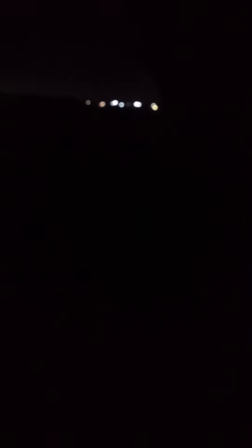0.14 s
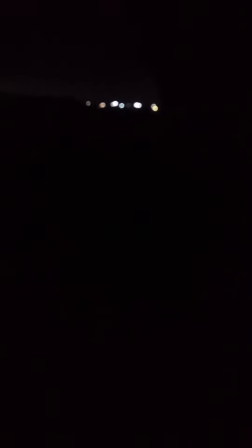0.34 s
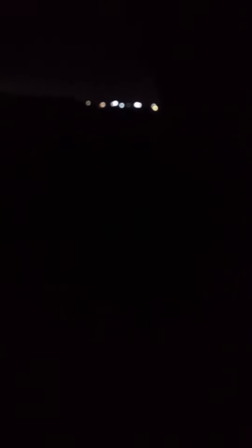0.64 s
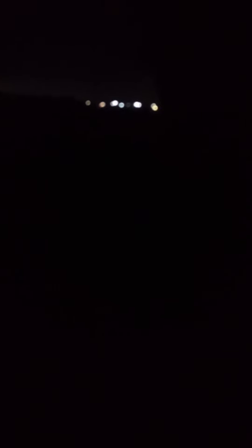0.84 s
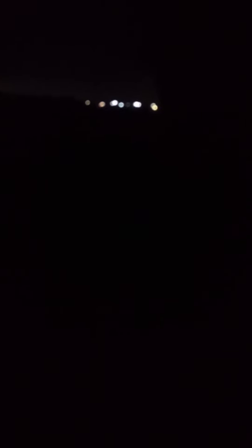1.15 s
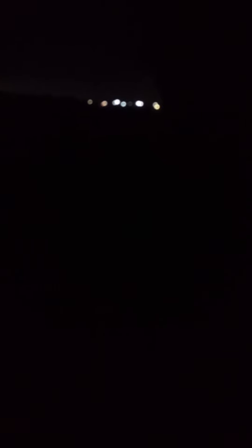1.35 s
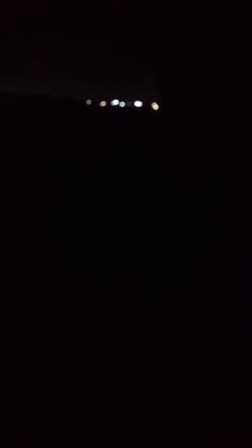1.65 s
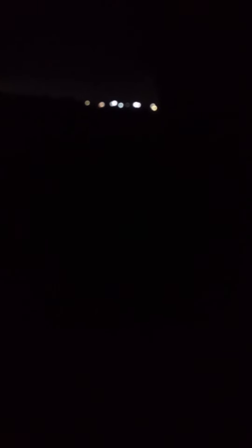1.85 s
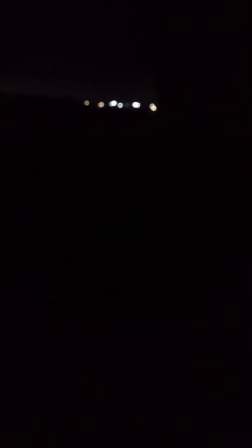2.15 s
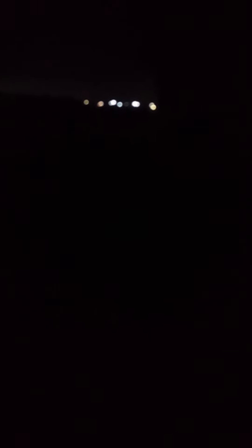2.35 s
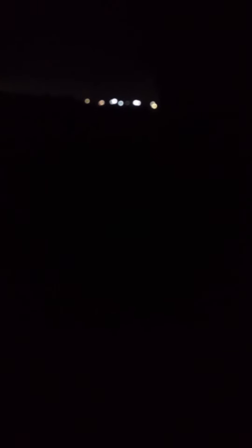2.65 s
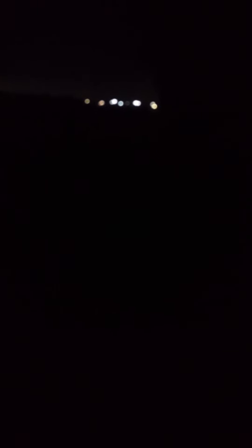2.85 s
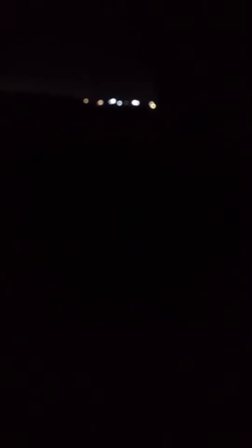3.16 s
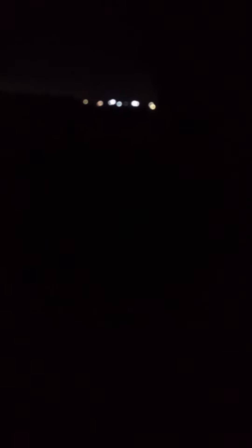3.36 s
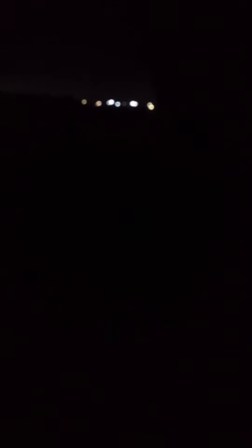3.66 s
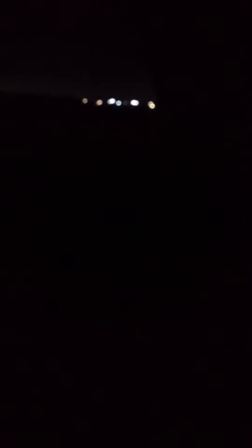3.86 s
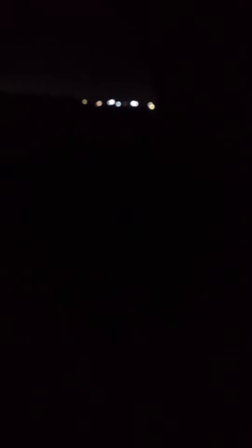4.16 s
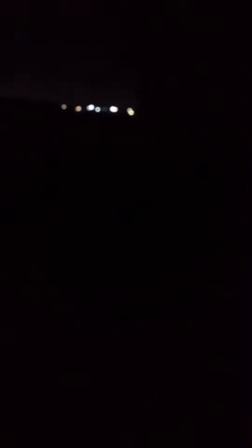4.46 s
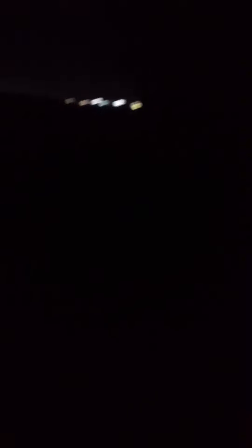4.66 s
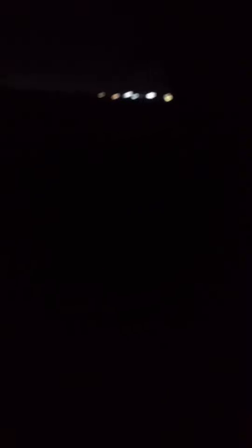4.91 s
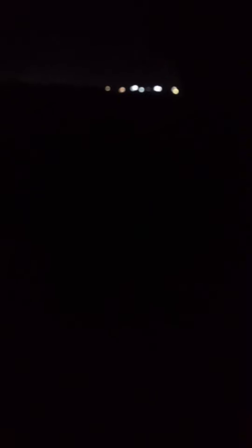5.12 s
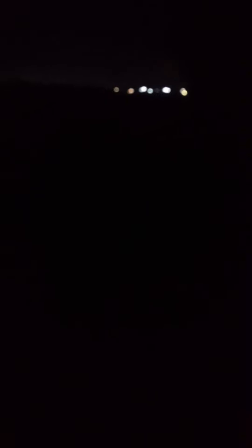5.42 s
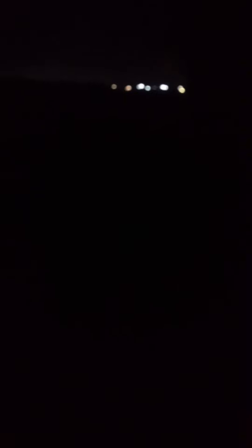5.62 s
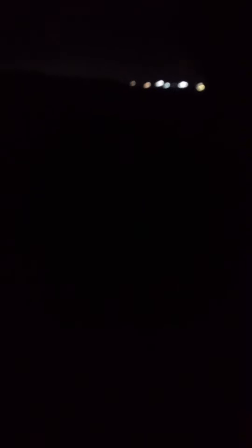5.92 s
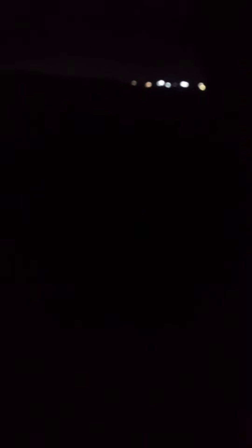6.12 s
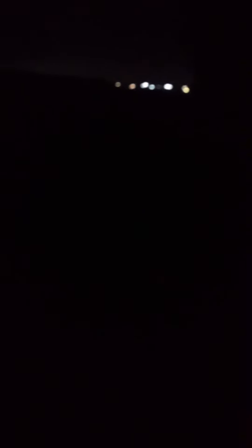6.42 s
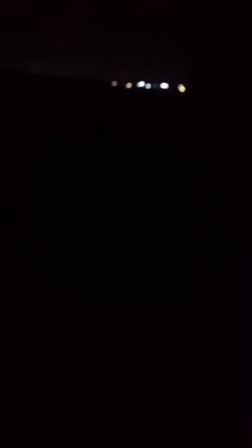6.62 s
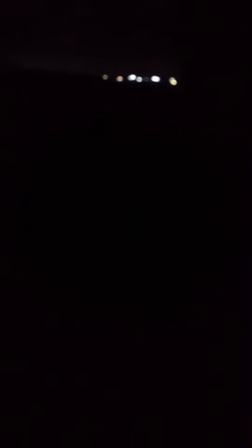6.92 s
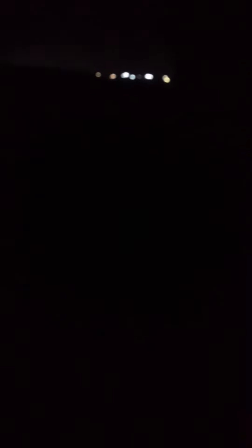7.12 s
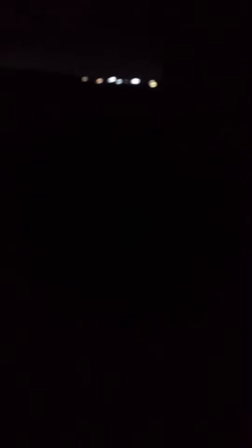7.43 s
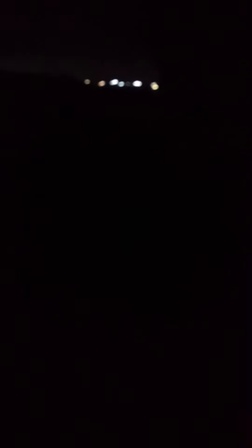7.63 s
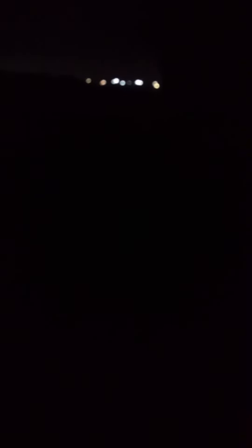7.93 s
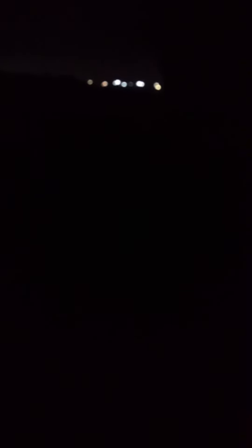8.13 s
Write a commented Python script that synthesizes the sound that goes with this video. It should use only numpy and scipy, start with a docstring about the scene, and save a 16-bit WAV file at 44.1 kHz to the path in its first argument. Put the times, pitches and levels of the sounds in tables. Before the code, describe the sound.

Frogs call at a night pond for the whole eight and a half seconds. The nearest, a tree frog, repeats a bright, buzzing rasp about twice a second, each call a fifth of a second long and rising slightly. Four others overlap and take turns further off over a faint chorus; a hoarse one doubles the lead until about 2.8 seconds. Much quieter, crickets trill and chirp about three times a second, a bush cricket hisses in very high pairs, and tiny falling squeaks, probably a bat, come now and then. A small insect ticks faintly around 2.7, 6 and 8 seconds. From 2.4 to 3.6 seconds a thin, slightly sinking whine surges twice. The hand-held microphone bumps softly throughout, most clearly near 1.2, 3, 5.7 and 7.3 seconds. A barely audible low drone swells early and near 5.6 seconds in the still air.

```python
"""A tree frog rasps close by at a night pond; four more take turns further off, over a faint chorus.
Each call is a train of about 120 pulses a second ringing a vocal sac whose two resonances rise as it
fills. Above the frogs, crickets chirp and trill, a bush cricket rasps in pairs, a small insect ticks
and something, probably a bat, squeaks. A thin whine passes, the hand-held microphone bumps softly,
and a low drone swells now and then in the still air."""
import sys
import numpy as np
from scipy import signal
from scipy.fft import rfft, irfft
from scipy.io import wavfile

SR = 44100
rng = np.random.default_rng(int(sys.argv[2]) if len(sys.argv) > 2 else 0)


def wrap_up_sound(samples):
    """Save the sound to the file named by the first command line argument, as 16-bit audio."""
    columns = np.atleast_2d(samples).T
    # keep every value between -1 and 1, then stretch to whole-number steps
    tamed = np.clip(columns, -1, 1)
    steps = np.round(tamed * 32767).astype(np.int16)
    wavfile.write(sys.argv[1], SR, steps)


N = 365148
T = np.arange(N) / SR


def frog_call(row, body, pulse_hz, upper_width_hz, lower_hz, lower_width_hz, rasp_db, glide, growth,
              grit, opening, tighten, strain=0, slowing=.04, jitter=.0087, shimmer_db=-.76):
    """One call: every pulse of the larynx rings the filling sac and the resonances of the body."""
    _, length, upper_hz, upper_db, lower_db = row
    most_pulses, size = 40, 768
    f, t = bins(size), np.arange(size) / SR
    time_luck, level_luck, pitch_luck = rng.standard_normal((3, most_pulses))
    noise = rng.standard_normal((most_pulses, size))
    # the pulses slow down as the air runs out
    air_spent = np.minimum(np.arange(most_pulses) / pulse_hz / length, 1)
    times = (np.cumsum(1 + slowing * air_spent ** 2 + jitter * time_luck) - 1) / pulse_hz
    count = int(np.sum(times < length))
    age = np.clip(times[:count, None] / length, 0, 1)
    # growth: share of the call spent swelling; glide: how far below its pitch the sac starts
    effort = np.interp(age, [0, .04, growth, .79, 1], [.053, .14, .97, .78, .14])
    effort *= undb(shimmer_db * level_luck[:count, None])
    filling = (1 - glide * (1 - age) ** 2) * (1 + .018 * pitch_luck[:count, None])
    upper = resonance(f, upper_hz * filling, upper_width_hz, 604)
    lower = resonance(f, lower_hz * filling * (1 + .015 * rng.standard_normal()), lower_width_hz, 480)
    # the body tightens or slackens as the sac fills, and no two calls sit quite alike
    tension = 1.004 - tighten * (1 - age) ** 2 + .0048 * rng.standard_normal()
    rasp = sum((-1) ** k * undb(db) * resonance(f, hz * tension, width, 1.93 * width)
               for k, (hz, width, db) in enumerate(body))
    strain_db = strain * (upper_db + 34)  # a straining frog is raspier when loud, purer when soft
    # the rasp opens up as the pressure builds, its highest resonances last
    rasp_gain = undb(upper_db + rasp_db + strain_db) * age ** (opening * f / 4000)
    # each pulse is a click wrapped in a short rough burst; grit sets the blend
    click_s = .003
    click = np.exp(-2j * np.pi * f * click_s)
    burst = noise[:count] * np.exp(-((t - click_s) / .0018) ** 2)
    rough = rfft(burst / np.linalg.norm(burst, axis=1, keepdims=True))
    spectrum = 0
    for shape, gain, share in [(upper, undb(upper_db), .49 * grit),
                               (lower, undb(lower_db), 1.14 * grit),
                               (rasp, rasp_gain, grit)]:
        shape = shape / np.sqrt(np.mean(np.abs(shape) ** 2, axis=-1, keepdims=True))
        spectrum = spectrum + gain * shape * (click + share * rough) / np.hypot(1, share)
    out = np.zeros(int(length * SR) + size)
    for when, pulse in zip(times, irfft(spectrum * effort)):
        add(out, when - click_s, pulse)
    return out * np.sqrt(SR / pulse_hz)


def frog(calls, body, pulse_hz, gain_db, **voice):
    """One frog's calls, all in its own voice, each at a slightly different pulse rate."""
    out = np.zeros(N)
    for row in calls:
        add(out, row[0], frog_call(row, body, pulse_hz * (1 + .009 * rng.standard_normal()), **voice))
    return out * undb(gain_db)


# The lead frog's calls. Each row: start in seconds, length in seconds, upper sac resonance in Hz,
# relative levels of the upper and the lower sac resonance in dB.
NEAR_FROG_CALLS = [(-0.018, 0.22, 3390, -33.5, -44.5), (0.475, 0.22, 3370, -31, -43),
                   (0.968, 0.19, 3394, -31, -43.5), (1.48, 0.25, 3363, -31, -45.5),
                   (2.001, 0.19, 3310, -31, -43.5), (2.544, 0.21, 3340, -31.5, -45),
                   (3.068, 0.22, 3366, -30.5, -54), (3.674, 0.19, 3370, -29, -45.5),
                   (4.19, 0.23, 3354, -30, -48.5), (4.747, 0.22, 3313, -31.5, -49.5),
                   (5.312, 0.21, 3310, -31.5, -50), (5.896, 0.2, 3356, -32, -67),
                   (6.44, 0.21, 3374, -32.5, -58), (6.975, 0.19, 3360, -31, -56),
                   (7.55, 0.21, 3347, -30.5, -53.5), (8.1, 0.21, 3420, -31, -56)]
# Body resonances that colour its rasp. Each row: centre in Hz, width in Hz, relative level in dB.
NEAR_FROG_BODY = [(1395, 270, -4.5), (1922, 307, -1), (2906, 276, 3), (3804, 280, 0), (4630, 430, -1.5),
                  (10980, 380, -24)]


def near_frog():
    """The lead voice: clean pulses ring a sharply tuned sac, about two calls a second."""
    return frog(NEAR_FROG_CALLS, NEAR_FROG_BODY, pulse_hz=123.6, gain_db=-.5,
                upper_width_hz=168, lower_hz=1235, lower_width_hz=135,
                rasp_db=-7, glide=.19, growth=.55, grit=.3, opening=.7, tighten=.0069)


# Its calls. Each row: start and length in seconds, upper resonance in Hz, upper and lower gain in dB.
HIGH_FROG_CALLS = [(0.07, 0.22, 3420, -47, -44.5), (1.407, 0.24, 3390, -37.5, -38.5),
                   (1.89, 0.2, 3420, -42, -41), (2.398, 0.24, 3400, -40.5, -42),
                   (2.95, 0.24, 3444, -34, -37.5), (3.525, 0.23, 3500, -38, -41.5),
                   (4.42, 0.22, 3430, -36.5, -42), (5.14, 0.22, 3380, -34.5, -41),
                   (6.03, 0.24, 3530, -39, -42.5), (6.59, 0.22, 3430, -36, -41.5),
                   (7.265, 0.22, 3370, -35, -41), (7.99, 0.23, 3350, -37.5, -44.5)]
# Its body resonances. Each row: centre in Hz, width in Hz, relative level in dB.
HIGH_FROG_BODY = [(1600, 244, 2), (2610, 1100, -4), (3733, 300, 7.5), (4450, 490, -1)]


def high_frog():
    """The neighbour whose sac rings highest, with a bright rasp."""
    return frog(HIGH_FROG_CALLS, HIGH_FROG_BODY, pulse_hz=117.4, gain_db=-.97,
                upper_width_hz=233, lower_hz=1474, lower_width_hz=175,
                rasp_db=-3.5, glide=.14, growth=.42, grit=.43, opening=.83, tighten=.036)


# Its calls. Each row: start and length in seconds, upper resonance in Hz, upper and lower gain in dB.
MIDDLE_FROG_CALLS = [(0.079, 0.21, 3220, -38, -51), (0.296, 0.19, 3260, -47, -64.5),
                     (0.604, 0.23, 3190, -34.5, -42.5), (0.787, 0.21, 3350, -51.5, -75),
                     (1.11, 0.2, 3140, -33.5, -43), (1.603, 0.2, 3216, -31.5, -40.5),
                     (2.115, 0.22, 3204, -31.5, -38.5), (2.682, 0.22, 3265, -31, -39),
                     (3.335, 0.19, 3176, -32.5, -41), (3.943, 0.21, 3167, -37, -45),
                     (4.545, 0.2, 3204, -36.5, -51), (5.025, 0.21, 3137, -38, -49.5),
                     (5.512, 0.23, 3150, -39, -53.5), (6.246, 0.22, 3100, -39, -48.5),
                     (6.923, 0.21, 3180, -41, -47), (7.15, 0.17, 3280, -47.5, -50),
                     (7.389, 0.2, 3115, -37.5, -44.5), (7.826, 0.26, 3160, -38, -49)]
# Its body resonances. Each row: centre in Hz, width in Hz, relative level in dB.
MIDDLE_FROG_BODY = [(1812, 250, 1.5), (2537, 66, 0.5), (3220, 680, -4), (4350, 730, -4)]


def middle_frog():
    """A purer voice in the middle that strains into a rasp on its louder calls."""
    return frog(MIDDLE_FROG_CALLS, MIDDLE_FROG_BODY, pulse_hz=125.16, gain_db=.4,
                upper_width_hz=183, lower_hz=1297, lower_width_hz=110,
                rasp_db=-10, glide=.19, growth=.55, grit=.46, opening=.97, tighten=.067, strain=.63)


# Its calls. Each row: start and length in seconds, upper resonance in Hz, upper and lower gain in dB.
DEEP_FROG_CALLS = [(-0.097, 0.21, 3210, -31.5, -36.5), (0.467, 0.16, 2986, -36, -40.5),
                   (0.958, 0.23, 3150, -43, -40), (1.494, 0.15, 3310, -33.5, -48.5),
                   (2.01, 0.27, 3090, -35, -46), (2.562, 0.23, 3060, -38, -44.5),
                   (3.181, 0.23, 3184, -31.5, -40), (3.775, 0.2, 3070, -35, -42),
                   (4.11, 0.22, 3080, -44.5, -46), (4.659, 0.23, 3220, -35.5, -43.5),
                   (5.165, 0.28, 3090, -37.5, -43.5), (5.65, 0.24, 3164, -37.5, -46),
                   (5.8, 0.18, 3030, -41, -45.5), (6.141, 0.23, 3146, -33, -40.5),
                   (6.785, 0.235, 3143, -34.5, -43), (7.666, 0.23, 3170, -37.5, -43.5),
                   (8.134, 0.19, 3080, -39, -43.5)]
# Its body resonances. Each row: centre in Hz, width in Hz, relative level in dB.
DEEP_FROG_BODY = [(1730, 300, -0.27), (2557, 49, -0.78), (2930, 770, 0.91), (4210, 530, -0.66)]


def deep_frog():
    """The lowest voice: its body slackens as the sac fills, so the rasp slides down."""
    return frog(DEEP_FROG_CALLS, DEEP_FROG_BODY, pulse_hz=127.46, gain_db=-2.03,
                upper_width_hz=300, lower_hz=1148, lower_width_hz=123,
                rasp_db=-6, glide=.076, growth=.4, grit=.63, opening=1.14, tighten=-.24)


# Its calls. Each row: start and length in seconds, upper resonance in Hz, upper and lower gain in dB.
HOARSE_FROG_CALLS = [(-.02, 0.2, 3380, -33, -44), (.49, 0.2, 3360, -33.5, -40.5),
                     (.98, 0.21, 3295, -33.5, -46), (1.51, 0.27, 3430, -37.5, -45.5),
                     (2.02, 0.23, 3420, -35.5, -39.5), (2.57, 0.24, 3300, -36.5, -49)]
# Its body resonances. Each row: centre in Hz, width in Hz, relative level in dB.
HOARSE_FROG_BODY = [(1604, 180, -3.5), (2150, 830, -3.5), (3690, 500, 4.5), (4980, 390, -7.5)]


def hoarse_frog():
    """Gritty pulses with a fast attack, doubling the lead for its first six calls."""
    return frog(HOARSE_FROG_CALLS, HOARSE_FROG_BODY, pulse_hz=131, gain_db=-1.6,
                upper_width_hz=300, lower_hz=1380, lower_width_hz=200,
                rasp_db=-1, glide=.17, growth=.19, grit=.66, opening=.73, tighten=.088)


# Faint tones that ring on after the loud calls. Each row: pitch in Hz, gain in dB.
RINGING_TONES = [(3550, -11), (3770, -7.5), (4400, -9.5), (5080, 1)]


def after_ring(x, width_hz=24):
    """A few sharp resonances keep sounding when a call has stopped."""
    f = bins(N)
    rings = sum(undb(db) / (1 + 1j * (f * f - hz * hz) / (f * width_hz)) for hz, db in RINGING_TONES)
    return x + irfft(rfft(x) * rings, N)


def frog_pond():
    """Five frogs, more smeared with distance, over a blurred far chorus."""
    near, high, middle = near_frog(), high_frog(), middle_frog()
    furthest = deep_frog() + hoarse_frog()
    pond = scatter(near, t60=.02, wet_db=-11) + scatter(middle, t60=.025, wet_db=-8)
    pond += scatter(high, t60=.025, wet_db=-7) + scatter(furthest, t60=.03, wet_db=-5)
    chorus = undb(-54 + 2 * walk(10)) * band(3080, 630)
    chorus += undb(-65.5 + 2 * walk(1.5)) * band(1213, 380)
    pond = after_ring(scatter(pond, t60=.2, wet_db=-18)) + chorus
    # the ground soaks up the lows
    pond = signal.sosfilt(signal.butter(8, 930, "high", fs=SR, output="sos"), pond)
    # the pulses carry little between the body's top resonance and the high overtone
    scoop_db = np.interp(bins(N), [5000, 5600, 7800, 10100], [2, 4, -25, 9])
    return irfft(rfft(pond) * undb(scoop_db), N)


def trill(gain, hz, width_hz, stroke_hz, depth):
    """An insect's wing strokes ring a narrow resonance: a band of noise with a fast tremolo."""
    strokes = 1 + depth * np.sin(phase(stroke_hz * (1 + .028 * walk(1.7))))
    return unit(band(hz, width_hz) * strokes) * gain


# The nearest cricket, about three chirps a second. Each row: middle in seconds, level in dB.
NEAR_CHIRPS = [(.14, -56), (.46, -55), (.81, -57), (1.17, -57), (1.47, -62), (1.82, -54.5), (2.17, -79),
               (2.55, -58), (2.72, -66), (2.97, -57), (3.6, -57), (4.02, -64), (4.5, -72), (4.72, -57),
               (5.07, -59), (5.4, -77), (5.62, -68), (6.27, -62), (6.43, -57), (6.79, -58), (7.14, -58),
               (7.45, -54), (7.8, -60), (8.15, -58)]


def crickets(chirp_s=.1, thin_period_s=.351, low_stops_s=4.15):
    """Four sets of wings: two crickets chirp, the thinner in strict time, and two trill."""
    chirps = swells([(middle, chirp_s, db) for middle, db in NEAR_CHIRPS])
    bed = undb(-64 + 1.9 * walk(18))  # more crickets behind the nearest
    thin = swells([(middle, chirp_s, -63.5) for middle in np.arange(.34, T[-1], thin_period_s)])
    stopping = undb(-69.5) * between(0, low_stops_s, .04)
    fading = undb(-65.5 - .77 * T)
    return (trill(np.hypot(chirps, bed), hz=6190, width_hz=270, stroke_hz=33, depth=.045)
            + trill(thin, hz=6523, width_hz=80, stroke_hz=55, depth=.1)
            + trill(stopping, hz=6770, width_hz=560, stroke_hz=61, depth=.1)
            + trill(fading, hz=9210, width_hz=450, stroke_hz=61, depth=.55))


# The bush cricket's pairs of syllables.
# Each row: middle of the first in seconds, syllable length in seconds, level in dB.
SYLLABLE_PAIRS = [(.03, .1, -64), (1.046, 0.071, -66), (1.71, 0.07, -71), (2.603, .08, -62),
                  (3.605, .08, -64), (4.145, 0.065, -64), (4.778, .11, -63.5), (5.79, .12, -64),
                  (6.702, 0.094, -61), (7.48, .07, -63), (8.07, .075, -64)]


def bush_cricket(spacing_s=.13, echo_s=.17, echo_db=-17.5):
    """Pairs of hissing syllables, each trailed by a soft echo, over others far away."""
    syllables = [(first + delay, length, db)
                 for first, length, db in SYLLABLE_PAIRS for delay in (0, spacing_s)]
    echoes = [(middle + length / 2, echo_s, db + echo_db) for middle, length, db in syllables]
    gain = swells(syllables) + swells(echoes) + undb(-93 + 2.5 * walk(4))
    return trill(gain, hz=15100, width_hz=1000, stroke_hz=110, depth=.4)


# Bouts of ticking. Each row: middle in seconds, length in seconds, level in dB.
TICKING_BOUTS = [(2.7, 2.2, -82), (6.05, 1.2, -74), (7.9, 1.1, -77)]


def ticking_insect(hz=8740, ticks_per_s=11, sharpness=70):
    """A small insect's short, high ticks, wandering a little in pitch and pace."""
    beat = phase(ticks_per_s * (1 + .03 * walk(3)))
    gate = np.exp(sharpness * (np.cos(beat) - 1))
    tone = np.sin(phase(hz * (1 + .0078 * walk(17))))
    return unit(gate * tone) * swells(TICKING_BOUTS)


# The clearest squeaks high overhead. Each row: middle in seconds, relative peak level in dB.
CLEAR_SQUEAKS = [(.77, -71), (1.395, -77), (2.159, -71), (3.253, -64), (3.47, -76), (4.6, -81), (5.17, -81),
                 (5.29, -68), (5.493, -70), (6.073, -74), (6.175, -65), (7.04, -77), (7.14, -74)]


def squeaks(top_hz=15800, fall_hz=1700, length_s=.06, spacing_s=.15, gain_db=-9):
    """Short falling whistles, probably a bat: a few clear and many faint, smeared on their way."""
    out, t = np.zeros(N), np.arange(int(length_s * SR)) / SR
    sweep = np.sin(phase(top_hz - fall_hz * t / length_s)) * np.hanning(len(t))
    faint = [((k + .25 * late) * spacing_s, -85 + 3 * loud)
             for k, (late, loud) in enumerate(rng.standard_normal((64, 2)))]
    for middle, db in CLEAR_SQUEAKS + faint:
        add(out, middle - length_s / 2, sweep * undb(db + gain_db))
    return scatter(out, t60=.07, wet_db=5)


# The whine's two surges. Each row: start in seconds, level in dB.
SURGES = [(2.411, -55.5), (2.77, -56.5)]


def whine(start_hz=849, sag_hz_per_s=50, stop_s=3.64, hold_db=-64.5, decay_s=.082):
    """A thin sinking whine with faint overtones and a rough edge; surges die back to a steady level."""
    first = SURGES[0][0]
    hz = start_hz - sag_hz_per_s * (T - first)
    angle = phase(hz * (1 + .0053 * walk(60)))
    tone = np.sin(angle) + undb(-11) * sum(np.sin(k * angle) / np.sqrt(k) for k in range(2, 7))
    roughness = 1 + undb(-9) * walk(90)
    gain = undb(hold_db) * between(first, stop_s, .016)
    for start, db in SURGES:
        gain += undb(db) * np.exp(-np.maximum(T - start, 0) / decay_s) * between(start, stop_s, .016)
    return unit(tone * roughness) * gain


# Bumps on the microphone. Each row: time in seconds, relative peak level in dB, pitch in Hz.
MIC_BUMPS = [(0.098, -47.5, 87), (0.196, -45, 81), (0.405, -44, 104), (0.762, -48, 72), (0.918, -49, 85),
             (1.1, -47, 81), (1.226, -37.5, 98), (1.323, -38.5, 90), (1.465, -45.5, 93), (1.643, -45.5, 90),
             (1.708, -39.5, 87), (2.345, -54.5, 90), (2.836, -38, 101), (3.047, -51, 85),
             (3.154, -38.5, 107), (3.878, -50, 90.5), (4.0, -54, 85), (4.15, -53, 79.6), (4.655, -47, 86),
             (4.76, -44.5, 99.4), (4.973, -47, 72), (5.136, -49.5, 112), (5.286, -55, 89),
             (5.706, -36.5, 87), (5.759, -43, 107), (5.819, -40.5, 67.4), (6.818, -42, 77),
             (7.255, -40.5, 83), (7.404, -52, 89)]


def handling(decay_cycles=.47, bump_db=1, rub_s=.13, rub_db=-15):
    """The hand bumps the microphone for a cycle or two and the grip rubs, over a low rumble."""
    out, t = np.zeros(N), np.arange(SR // 10) / SR
    for start, db, hz in MIC_BUMPS:
        bump = np.sin(2 * np.pi * hz * t) * t * np.exp(-t * hz / decay_cycles)
        add(out, start - .004, bump / np.abs(bump).max() * undb(db + bump_db))
    rubbing = swells([(start + .018, rub_s, db + rub_db) for start, db, _ in MIC_BUMPS])
    rumble = undb(-69 + 4.5 * walk(9))
    out += band(79.6, 61) * np.hypot(rubbing, rumble)
    return signal.sosfilt(signal.butter(3, 45, "high", fs=SR, output="sos"), out)


# Swells of the drone. Each row: middle in seconds, length in seconds, level in dB.
LOW_SWELLS = [(.16, 0.069, -62.5), (0.525, 0.41, -70.5), (1.274, 0.28, -71.5), (5.567, .2, -66)]


def drone(hz=320, width_hz=60, bed_db=-84.5):
    """A faint, blurred low tone far away that swells now and then."""
    return band(hz, width_hz) * (undb(bed_db) + swells(LOW_SWELLS))


# The colour of still night air. Each row: frequency in Hz, relative level in dB.
AIR_COLOUR = [(30, -10), (80, -6), (150, 1.5), (240, -2.5), (315, -4.5), (420, -15.5), (700, -13),
              (2000, -50), (5500, -9), (7800, -21.5), (10300, -15), (13000, -26), (16000, -43.5)]


def night_air(level_db=-68):
    """A quiet bed of shaped noise, swelling a little."""
    hz, shape_db = np.transpose(AIR_COLOUR)
    colour = undb(np.interp(np.log(bins(N)), np.log(hz), shape_db))
    return coloured_noise(colour) * undb(level_db + .79 * walk(5.1))


def scatter(x, t60, wet_db):
    """Direct sound plus echoes from reeds and banks that die by 60 dB in t60 seconds."""
    t = np.arange(SR // 2) / SR
    tail = rng.standard_normal(len(t)) * np.exp(-np.log(1000) * t / t60) * (t > .001)
    return x + undb(wet_db) * signal.fftconvolve(x, tail / np.linalg.norm(tail))[:N]


def resonance(f, hz, width, skirt):
    """Resonators in a row: the narrow one sets the ring, the two wide ones the attack and the skirts."""
    detune = 1j * (f * f - hz * hz) / f
    return 1 / ((1 + detune / width) * (1 + detune / skirt) ** 2)


def band(hz, width):
    """Noise in one steep resonance, rms 1."""
    return coloured_noise(resonance(bins(N), hz, width, 2 * width))


def coloured_noise(colour):
    """Noise with the given spectrum, rms 1."""
    return unit(irfft(rfft(rng.standard_normal(N)) * colour, N))


def swells(rows, rate=500):
    """Smooth rises and falls from rows of (middle s, length s, dB), half as strong at their ends."""
    middle, length, db = np.transpose(rows)
    t = np.arange(0, T[-1] + 1, 1 / rate)
    gains = undb(db) * np.exp2(-np.minimum((2 * (t[:, None] - middle) / length) ** 2, 20))
    return np.interp(T, t, np.linalg.norm(gains, axis=1))


def between(start, stop, fade):
    """A gate that is open from start to stop, with a short fade outside."""
    return np.clip(1 + np.minimum(T - start, stop - T) / fade, 0, 1)


def walk(rate):
    """Smooth random wander with a spread near 1."""
    knots = rng.standard_normal(1024)
    return np.interp(T * rate, np.arange(len(knots)), knots)


def add(out, start, x):
    """Mix x into out from a time in seconds."""
    i = int(start * SR)
    a, b = max(i, 0), min(i + len(x), len(out))
    if b > a:
        out[a:b] += x[a - i:b - i]


def phase(hz):
    """Running phase of a moving pitch, in radians."""
    return 2 * np.pi * np.cumsum(hz) / SR


def bins(size):
    """Frequencies of a real spectrum, kept off zero."""
    return np.maximum(np.fft.rfftfreq(size, 1 / SR), 1)


def undb(db):
    """Decibels to gain."""
    return 10 ** (np.asarray(db) / 20)


def unit(x):
    """Scale to rms 1."""
    return x / np.sqrt(np.mean(x ** 2))


def scene():
    """Everything at one microphone."""
    animals = frog_pond() + crickets() + bush_cricket() + ticking_insect() + squeaks()
    return (animals + whine() + drone() + handling() + night_air())[None]


def record(dry, top_hz=15850):
    """The recorder cuts the top with a steep low-pass."""
    return signal.sosfilt(signal.ellip(10, .2, 70, top_hz, fs=SR, output="sos"), dry)


dry = scene()
out = record(dry)
wrap_up_sound(out)
```